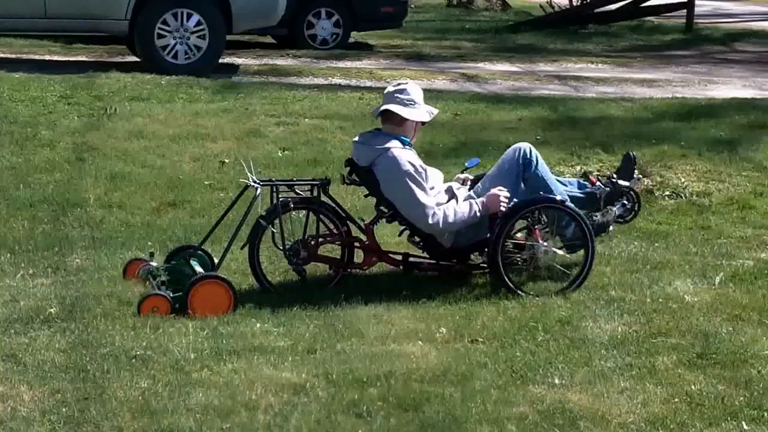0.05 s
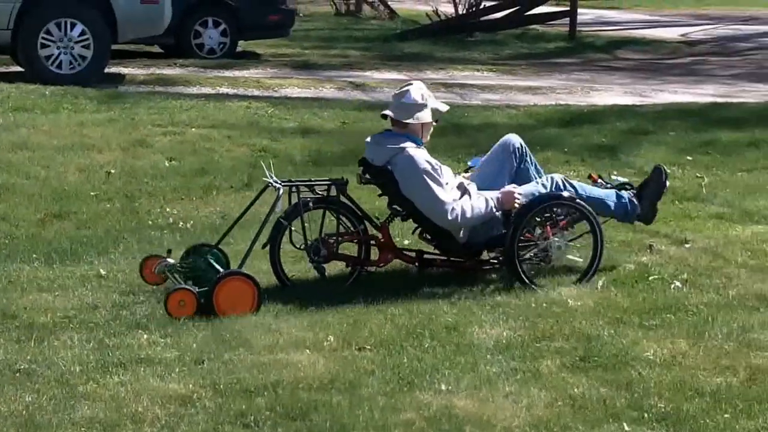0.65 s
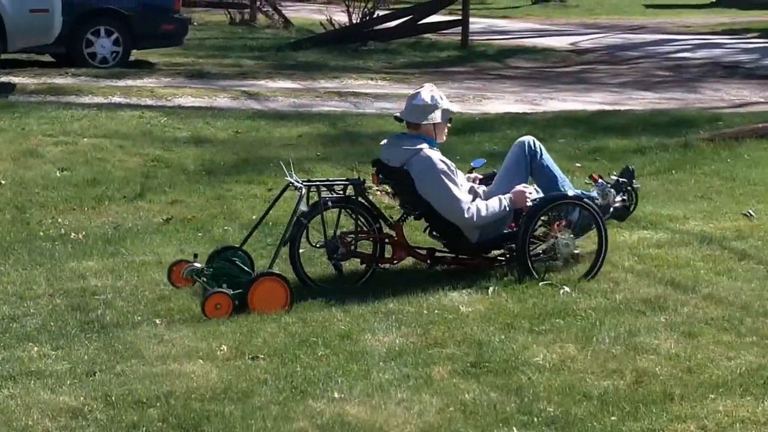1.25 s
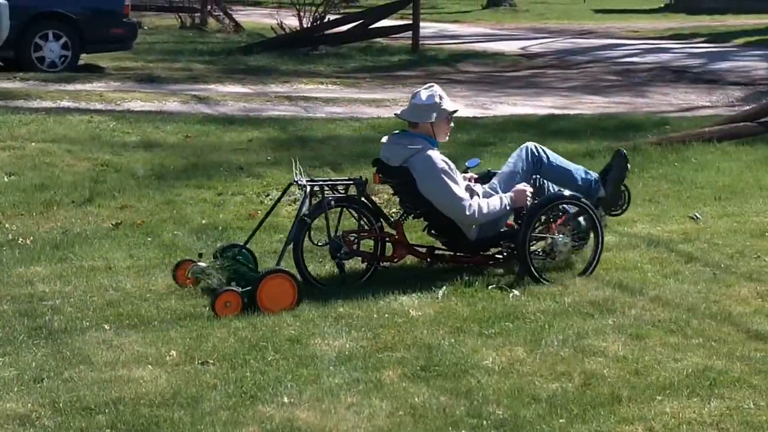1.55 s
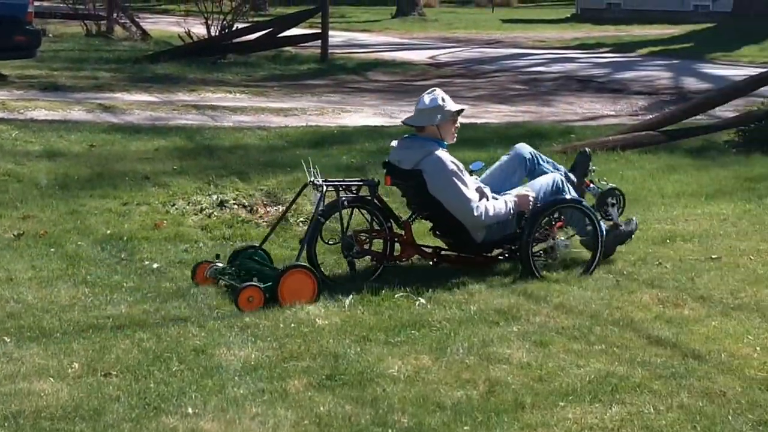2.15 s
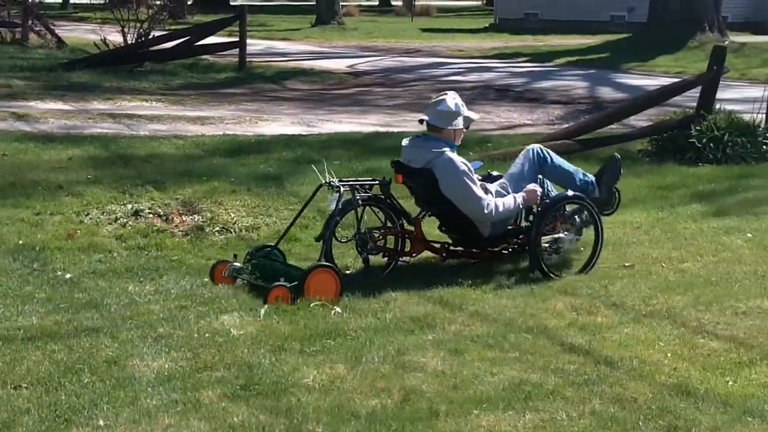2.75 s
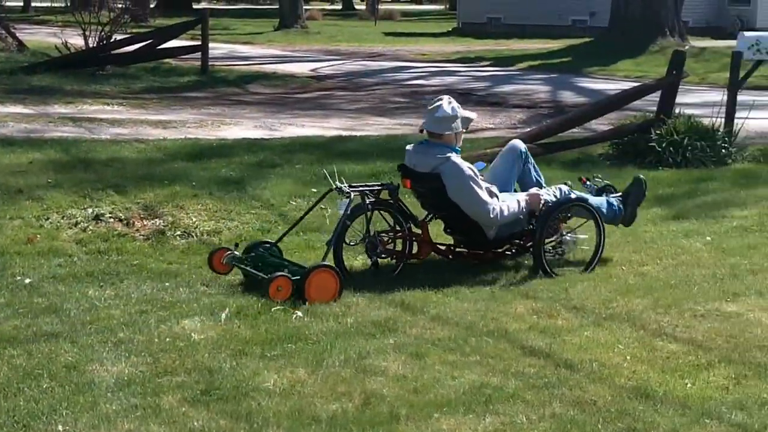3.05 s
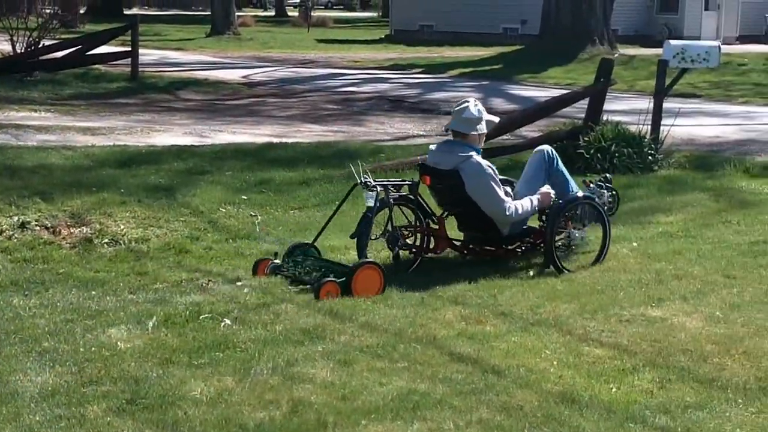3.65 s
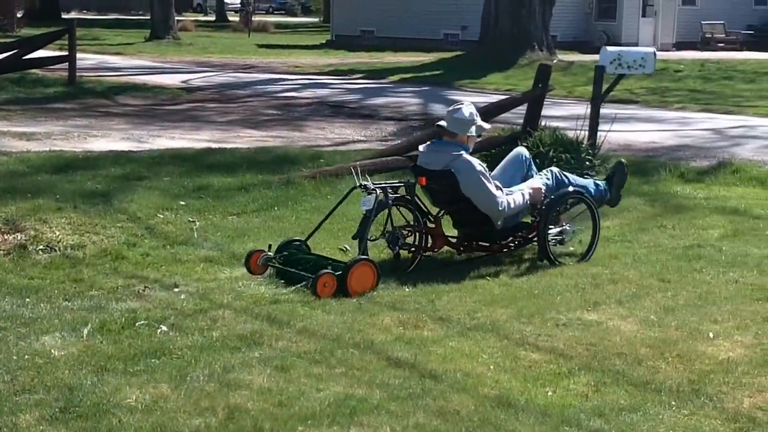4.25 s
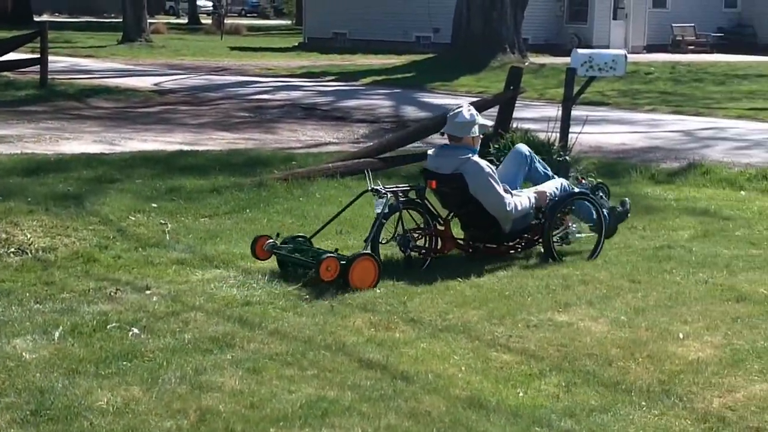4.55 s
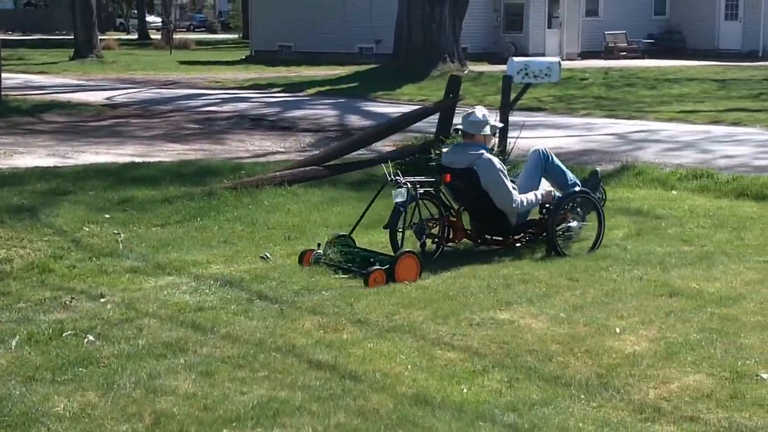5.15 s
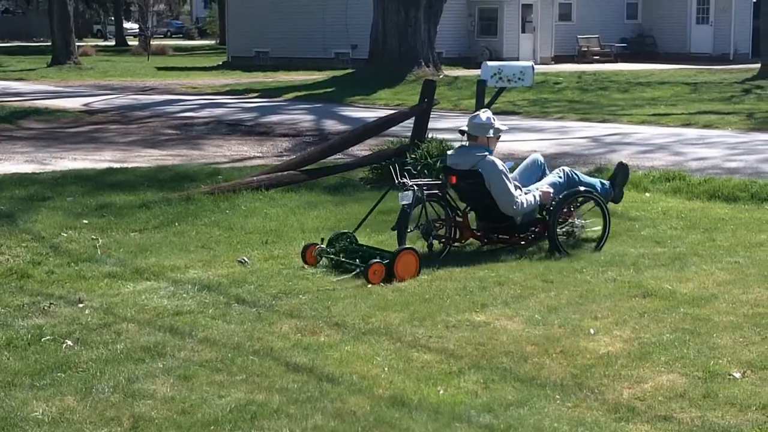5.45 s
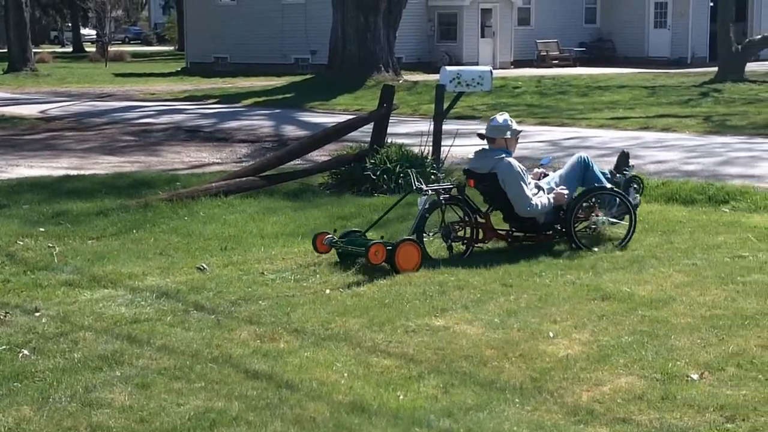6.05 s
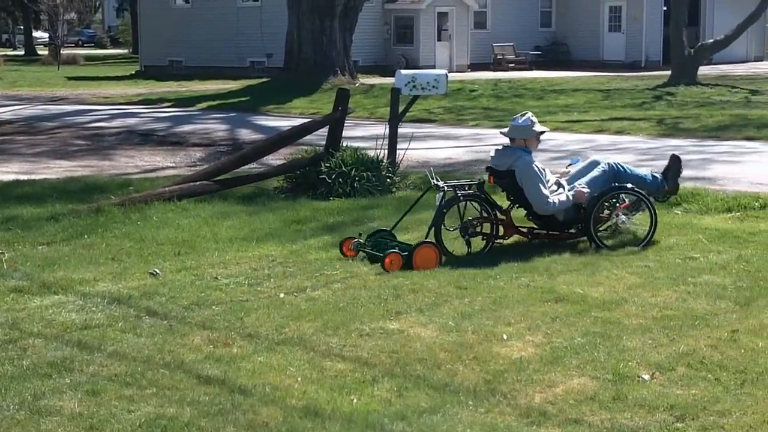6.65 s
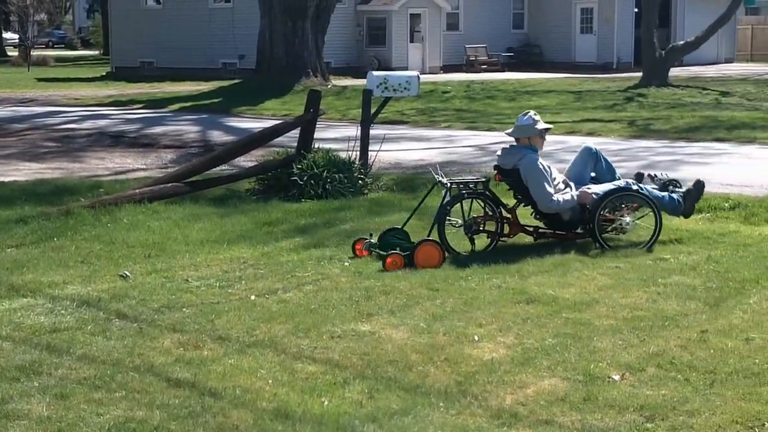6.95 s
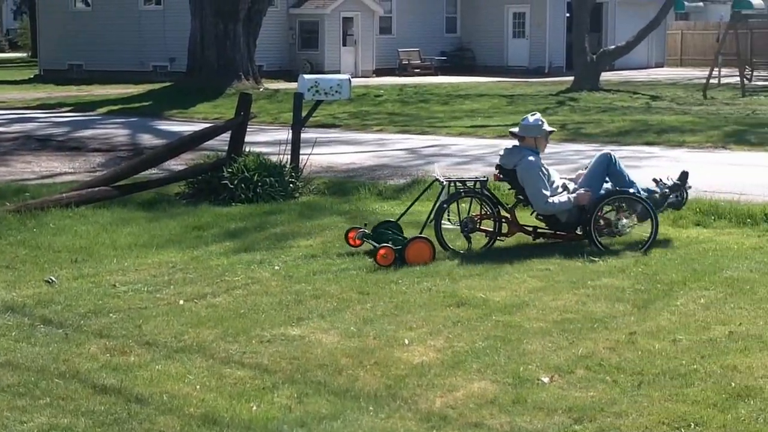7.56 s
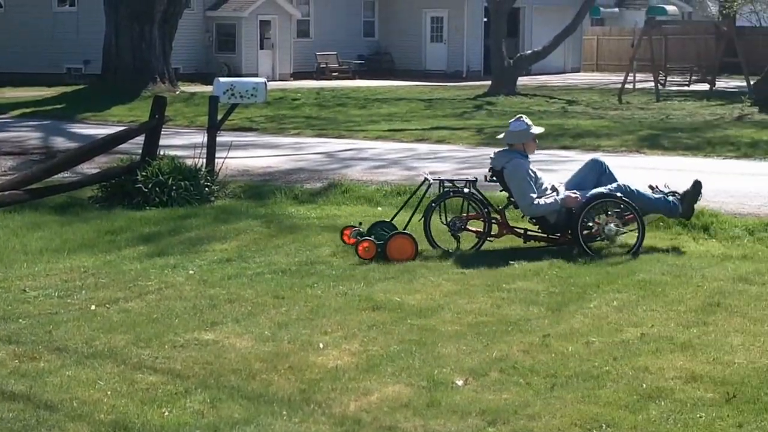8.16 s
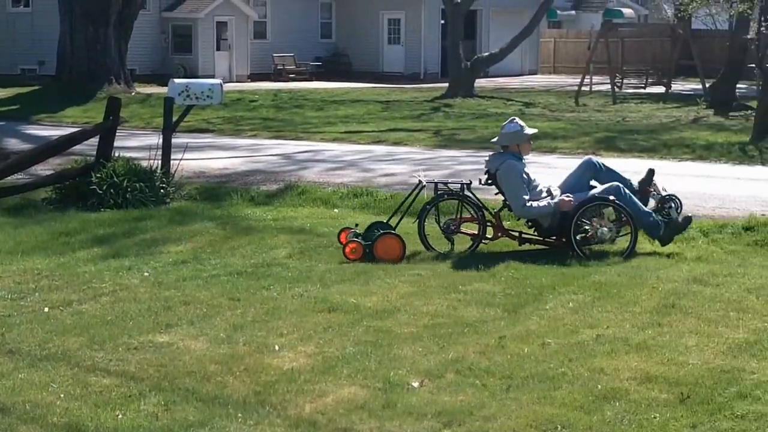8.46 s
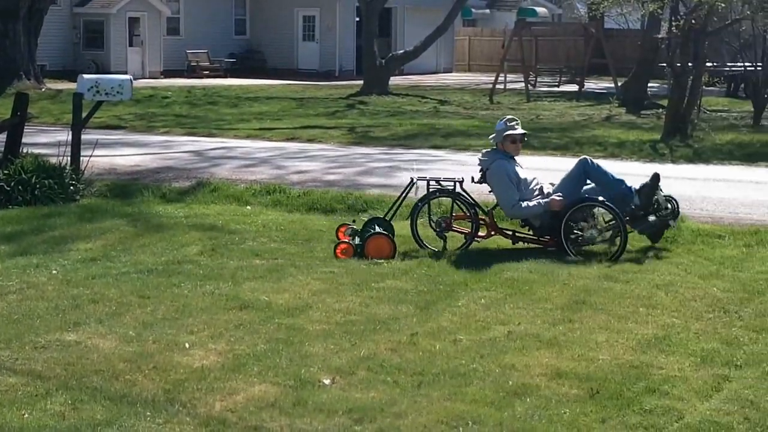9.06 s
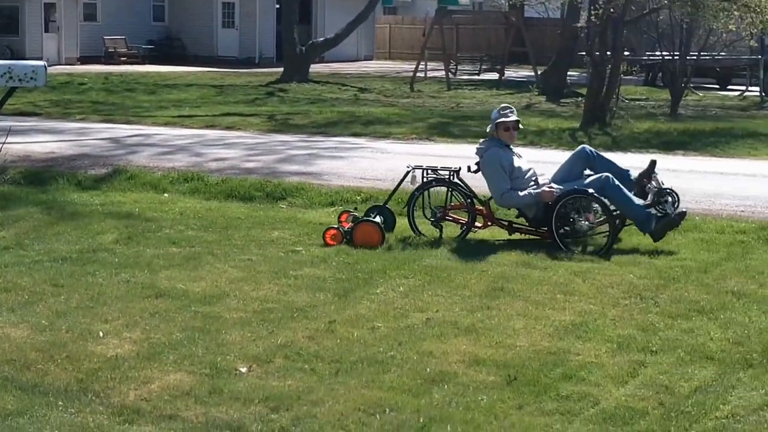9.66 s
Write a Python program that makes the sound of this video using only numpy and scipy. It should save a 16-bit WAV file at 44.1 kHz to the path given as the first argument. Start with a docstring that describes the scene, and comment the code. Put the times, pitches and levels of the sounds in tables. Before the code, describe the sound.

Out on a lawn, the spinning blades of a reel mower rasp through the grass ahead of the microphone, with sharp metallic knocks and rattles. Low gusts of wind soon rumble and thump on the microphone, coming and going to the end. Faint birds whistle downward at first, later piping and trilling, while an engine hums far away and the mower draws off a little.

```python
"""A reel mower towed over a lawn behind a pedal trike, heard ahead of a camera's stereo microphone.
From the start the blades snip and scrape, the frame clacks over bumps, an engine hums far off and a
distant bird slurs downwards. From 2 s gusts buffet the microphone, hardest near 4 s. After 5 s a bird
buzzes and pipes, then trills near 7 s as the slurs return. The mower, fainter by now, cuts on
under a last gust."""
import sys
import numpy as np
from scipy import signal
from scipy.fft import rfft, irfft, next_fast_len
from scipy.io import wavfile
from scipy.ndimage import uniform_filter1d, map_coordinates

SR = 44100
rng = np.random.default_rng(int(sys.argv[2]) if len(sys.argv) > 2 else 0)


def master_out(mix):
    """Clip the mix to full scale and print it as 16-bit PCM to the path in sys.argv[1]."""
    frames = np.transpose(np.atleast_2d(mix))
    ceiling = np.clip(frames, -1, 1)
    pcm = np.round(ceiling * 32767).astype(np.int16)
    wavfile.write(sys.argv[1], SR, pcm)


N = 436590

# The mower, ahead. Its reel spins between bites, fading as it draws away: (time [s], level [dB])
REEL_SPIN = [(0, -52), (1.8, -48), (2.02, -59), (2.15, -56.5), (4.2, -51.5), (4.62, -58), (4.75, -57),
             (7.0, -54), (9.9, -55)]
# bites into standing grass; lush tufts that throw clippings: (start [s], length [s], level [dB])
GRASS_BITES = [(.03, 0.45, -42.5), (.56, 0.91, -48.5), (1.5, 0.22, -45), (2.18, 0.37, -45.5),
               (2.68, 0.28, -47.5), (3.05, 0.031, -44), (3.42, 0.545, -45.5), (4.82, 0.235, -48),
               (5.04, 0.49, -47), (5.93, 0.27, -54), (6.39, 0.424, -51), (7.83, 0.89, -52.5),
               (9.02, 0.33, -51.5), (9.7, 0.3, -52.5)]
LUSH_TUFTS = [(.29, 0.069, -48), (1.53, 0.017, -46), (1.68, 0.034, -48.5), (2.78, 0.033, -51),
              (3.74, 0.33, -50.5), (4.95, 0.38, -54), (5.28, 0.15, -49), (6.62, 0.12, -57.5),
              (9.02, 0.28, -58.5)]
# spectra of cutting, flying clippings and dry snaps: (frequency [Hz], density [dB])
CUT_SPECTRUM = [(250, -12.5), (400, -6), (550, 2.5), (850, -8), (1000, -13), (1200, 1), (2050, -1.5),
                (3300, -2), (4000, -3.5), (5000, -25.5), (6200, -18.5), (7500, -34.5), (11000, -86)]
SPRAY_SPECTRUM = [(1700, -17.5), (3200, -0.5), (4800, -2), (6100, -9), (7400, -42.5), (9000, -28),
                  (10500, -20.5), (12000, -27), (15000, -39)]
SNAP_SPECTRUM = [(250, -33), (850, -18), (1200, -0.5), (2000, -1.5), (3300, 5), (4000, -1), (5000, -15),
                 (6200, -26), (7500, -47), (12000, -64)]
# narrow ring of the blades: (frequency [Hz], gain [dB])
BLADE_MODES = [(1065, 10), (1400, -14), (1825, 7.5), (2410, 8), (2990, 1), (4860, 5)]
# a blade grazes the bed knife: (start [s], length [s], level [dB], resonance [Hz])
KNIFE_GRAZES = [(1.915, .026, -45, 1300), (4.012, 0.022, -42.5, 2710)]
# the frame and hitch knock: (time [s], peak level [dB])
FRAME_KNOCKS = [(0.3229, -15), (0.337, -20.5), (0.4914, -25.5), (0.7049, -26), (1.5254, -25.5),
                (1.7904, -30), (1.8594, -26.5), (1.895, -32), (1.9186, -25.5), (1.9339, -27),
                (1.9968, -23.5), (2.001, -20.5), (2.0156, -20), (2.028, -30), (2.0598, -28),
                (2.0899, -14.5), (2.0955, -12), (2.1098, -23), (2.2563, -27), (2.646, -22), (2.709, -25.5),
                (3.0875, -26), (3.2595, -30), (3.411, -28), (3.434, -28), (3.495, -23.5), (4.751, -27),
                (4.7622, -27), (4.791, -26), (4.9054, -22), (6.3681, -21), (6.3733, -19.5), (6.4155, -28.5),
                (6.454, -30.5), (6.4856, -24), (6.739, -36), (6.7492, -30.5), (7.4533, -25),
                (8.2775, -28.5), (8.4246, -31), (8.4588, -28.5), (8.525, -30.5), (8.7393, -25.5),
                (8.756, -33), (9.187, -30), (9.576, -32), (9.5802, -19), (9.614, -25.5)]
# ring of the steel frame: (frequency [Hz], width [Hz], gain [dB])
FRAME_MODES = [(520, 120, -9), (1070, 130, -6), (1290, 170, -3), (1610, 170, -2), (2080, 1450, -8),
               (2360, 700, 0), (3100, 600, 0), (3640, 240, 1), (4800, 300, -11)]

# Wind, right on the microphone. Steady push of the breeze: (time [s], level [dB])
BREEZE_PUSH = [(0, -45), (1.3, -41), (2.1, -33), (3.0, -32.5), (4.4, -47), (4.65, -37), (4.95, -30.5),
               (5.45, -40.5), (6.3, -30), (7.3, -39.5), (8.0, -45.5), (8.35, -35.5), (8.7, -45), (9.9, -28)]
# gusts: (start [s], length [s], push [dB], fine turbulence [dB])
WIND_GUSTS = [(0.802, 0.067, -35, -51), (1.131, 0.016, -38.5, -42), (1.525, 0.022, -31, -43),
              (1.811, 0.036, -30.5, -41), (2.084, 0.33, -42, -42.5), (2.619, 0.063, -33, -37.5),
              (2.79, 0.078, -34, -32.5), (3.273, 0.071, -33, -29.5), (3.42, 0.079, -28.5, -44),
              (3.632, 0.12, -28, -29.5), (3.752, 0.2, -27, -23.5), (4.008, 0.11, -29, -26),
              (4.117, 0.076, -27, -29.5), (4.818, 0.096, -36.5, -56), (5.797, 0.13, -29.5, -32.5),
              (6.212, 0.13, -31.5, -30.5), (6.525, 0.028, -26.5, -23.5), (7.07, 0.044, -38, -39),
              (7.696, 0.12, -40.5, -41.5), (8.922, 0.15, -35, -38.5), (9.293, 0.03, -33, -46),
              (9.578, 0.11, -36, -31.5), (9.719, 0.15, -25.5, -32.5)]
# spectra of the rumble, the slowest eddies and fine turbulence: (frequency [Hz], density [dB])
RUMBLE_SPECTRUM = [(20, -36), (45, -4), (70, 0.5), (100, -3), (140, -13), (200, -22), (350, -43.5),
                   (2500, -120)]
SLOW_EDDY_SPECTRUM = [(12, -6), (38, 0), (70, -10), (700, -120)]
FLUTTER_SPECTRUM = [(40, -14.5), (115, 7.5), (170, 4.5), (280, -4.5), (420, -17), (600, -27), (950, -37.5),
                    (5000, -120)]
# the slowest eddies against the rest of the rumble: (time [s], gain [dB])
SLOW_EDDY_GAIN = [(0, -12), (4, -8.5), (6.5, -2), (8.6, 7), (9.9, 0.5)]
# sudden slaps of wind: (time [s], peak level [dB], eddy frequency [Hz])
WIND_SLAPS = [(3.638, -23, 139), (3.774, -17.5, 110), (3.801, -14, 140), (3.815, -18, 120),
              (3.859, -12.5, 150), (3.899, -10.5, 119), (3.913, -15, 100), (3.931, -14.5, 80),
              (3.991, -19, 149), (4.045, -15.5, 150), (4.066, -17.5, 169), (4.085, -19.5, 130),
              (4.18, -22, 80), (5.807, -16.5, 110), (5.818, -26, 128), (5.847, -22.5, 120),
              (5.942, -26, 90), (6.528, -21.5, 120), (6.543, -17, 229), (6.55, -11.5, 73.5),
              (7.073, -27, 110), (7.111, -21.5, 117), (7.785, -23.5, 87.5), (8.935, -20, 110),
              (9.298, -22.5, 101), (9.63, -12.5, 128), (9.641, -21, 129)]
# wind moaning round the camera body: (time [s], pitch [Hz], level [dB])
WIND_MOAN = [(1.9, 95, -50), (2.2, 106.3, -26), (2.5, 98.3, -47), (2.7, 133.9, -37), (2.85, 141.6, -25.5),
             (3.12, 124.3, -58), (3.3, 123, -24), (3.5, 129.7, -40), (3.75, 145.5, -20.5), (4.0, 146, -79)]

# Birds, at a distance. Note shapes: (time into the note [s], pitch [Hz], level [dB])
SLUR_SHAPE = [(0, 3600, -12), (.03, 3170, -2), (.07, 2500, 0), (.11, 2110, 0), (.15, 1920, 0),
              (.185, 1840, -7)]
ARCH_SHAPE = [(0, 4350, -12), (.025, 4680, 0), (.055, 4800, 0), (.09, 4480, -8)]
FALL_SHAPE = [(0, 5000, -10), (.02, 4850, 0), (.045, 4400, -1), (.075, 3450, -3)]
PEEP_SHAPE = [(0, 6250, -4), (.012, 6050, 0), (.025, 5850, -5)]
BUZZ_SHAPE = [(0, 5800, -12), (.04, 6100, 0), (.1, 6150, 0), (.15, 5800, -12)]
LOW_PIPE_SHAPE = [(0, 2850, -14), (.045, 2945, 0), (.08, 2965, 0), (.12, 2945, -3), (.17, 2980, -5),
                  (.21, 3040, -20)]
HIGH_PIPE_SHAPE = [(0, 3150, -45), (.045, 3120, -4), (.068, 3120, -2), (.095, 3185, -1), (.16, 3165, -5),
                   (.21, 3180, -20)]
TRILL_SHAPE = [(0, 5000, -6), (.006, 4500, 1), (.016, 3600, -2), (.028, 3300, -45), (.038, 4900, -11),
               (.046, 6500, -14), (.056, 7100, -18), (.068, 7400, -21), (.076, 7450, -34)]
# when each note is sung: (time [s], level [dB])
SLUR_NOTES = [(.4, -51), (.79, -48.5), (1.16, -48), (1.53, -47), (7.018, -53), (7.475, -52.5),
              (7.884, -51.5), (8.222, -51), (8.572, -49.5)]
ARCH_NOTES = [(.695, -50.5), (4.83, -56)]
FALL_NOTES = [(2.54, -59), (2.68, -55)]
PEEP_NOTES = [(3.024, -57), (3.148, -64), (3.252, -64)]
BUZZ_NOTES = [(5.45, -61), (5.94, -61.5), (6.43, -62)]
PIPE_NOTES = [(5.668, -47.5), (6.172, -48)]

# Far off. An engine's hum: (time [s], pitch [Hz], level [dB])
ENGINE_HUM = [(0, 69, -53), (1.8, 68.5, -44), (3.2, 70.74, -47.5), (4.4, 73.53, -37), (5.2, 70, -49),
              (9.9, 69.2, -46)]
# spectrum of the open air: (frequency [Hz], density [dB])
AIR_SPECTRUM = [(30, 10), (150, 4), (330, -2.5), (1100, -5), (2000, -21.5), (3400, -33), (5000, -42.5),
                (6300, -33.5), (7600, -40), (10500, -35), (15000, -39.5)]

# The microphone. How alike its two ports hear: (frequency [Hz], likeness [0-1])
PORT_LIKENESS = [(300, .99999), (1000, .998), (2500, .994), (4500, .97), (8000, .68), (12000, .58)]
# the camera's narrow stop bands: (frequency [Hz], width [Hz])
CAMERA_NOTCHES = [(4215, 420), (7900, 800), (8800, 400), (12700, 700)]


def reel(blade_hz=48, snip_db=0.5, judder_db=1.63, ring_width_hz=55):
    """Blades sweep the bed knife, shear stalks and ring; stems snap, clippings fly, parts chatter."""
    def blades(f):
        modes = sum(amp(db) / (1 + 2j * (f - hz) / ring_width_hz) for hz, db in BLADE_MODES)
        return modes / (1 + (f / 6500) ** 8)

    spin_db, = curves(REEL_SPIN)
    cutting = np.sqrt(amp(spin_db) ** 2 + swells(GRASS_BITES, attack_s=0.099, release_s=0.048))
    showers = swells(LUSH_TUFTS, attack_s=0.05, release_s=0.021)
    clippings = np.sqrt((amp(-10.5) * cutting) ** 2 + showers)
    blade_passes = np.cumsum(blade_hz * amp(1.5 * wobble(3.5))) / SR
    stroke = amp(snip_db * np.cos(2 * np.pi * blade_passes) + judder_db * wobble(110))
    shear = stroke * (.85 * noise() + .65 * unit(impacts(rate=550, spread_db=2)))
    rasp = amp(-1) * coloured(scrape_patches(shear, depth_db=3.2), CUT_SPECTRUM)
    ring = amp(-8) * unit(filtered(stroke * impacts(rate=250, spread_db=5.5), blades))
    chatter = amp(-10) * unit(filtered(impacts(rate=60, spread_db=1.5), steel_frame))
    spray = amp(-0.5) * coloured(np.sqrt(stroke) * noise(), SPRAY_SPECTRUM)
    snaps = amp(-12) * coloured(impacts(rate=55, spread_db=2), SNAP_SPECTRUM)
    return cutting * (rasp + ring + chatter + snaps) + clippings * spray


def scrape_patches(x, depth_db):
    """Every scrape excites its own few pitches: brief narrow patches of random gain."""
    spectra = signal.stft(x, nperseg=512)[2]
    patches = uniform_filter1d(rng.standard_normal(spectra.shape), size=3, axis=0)
    patches = uniform_filter1d(patches, size=4, axis=1)
    return signal.istft(spectra * amp(depth_db * unit(patches)), nperseg=512)[1][:N]


def knife_grazes(q=2.4):
    """Steel rubs on steel for a moment and sings in one broad resonance."""
    rub = lambda hz: unit(filtered(noise(), lambda f: 1 / (1 + 2j * q * (f / hz - 1)) ** 2))
    return sum(rub(hz) * np.sqrt(swells([swell], attack_s=0.0091, release_s=0.0085))
               for *swell, hz in KNIFE_GRAZES)


def frame_clacks(body_hz=1900, scrape_t60=.052, rebound_t60=.085, grind_t60=.012):
    """Steel snaps on steel; slack parts scrape before each knock and rebound after, ringing the frame."""
    out, lead = np.zeros(N), SR // 40
    t = np.arange(-lead, SR // 8) / SR
    contact = (np.arange(len(t)) == lead) * 1.0
    for s, db in FRAME_KNOCKS:
        body_db = rng.normal(6, 3.1)
        body = lambda f: amp(body_db / (1 + (f / body_hz) ** 4))
        ticks = unit(rng.standard_normal(len(t)) * (rng.random(len(t)) < 600 / SR))
        rattle = ticks * amp(-60 * np.abs(t) / np.where(t < 0, scrape_t60, rebound_t60))
        grind = rng.standard_normal(len(t)) * (t >= 0) * amp(-13 - 60 * np.abs(t) / grind_t60)
        mode_db = rng.normal(0, 2.5, len(FRAME_MODES))
        ring = filtered(rattle, lambda f: steel_frame(f, mode_db) * body(f))
        snap = filtered(contact + grind, lambda f: amp(along(SNAP_SPECTRUM, f)) * body(f))
        add(out, s + t[0], amp(db) * peaked(peaked(snap) + amp(-10) * peaked(ring)))
    return out


def steel_frame(f, mode_db=(0,) * len(FRAME_MODES), contact_hz=5600):
    """Response of the frame, each mode with its own extra gain; blunt contact leaves out the top."""
    modes = sum((-1) ** k * amp(db + mode_db[k]) * 1j * f * width / (hz * hz - f * f + 1j * f * width)
                for k, (hz, width, db) in enumerate(FRAME_MODES))
    return modes * signal.freqs(*signal.butter(N=5, Wn=contact_hz, analog=True), f)[1]


def wind(puff_db=4.3, puffs_per_s=8, lump_db=3.5):
    """Gusts ride a puffing breeze, press on the microphone and break into turbulence and slaps."""
    breeze_db, slow_db = curves(BREEZE_PUSH) + curves(SLOW_EDDY_GAIN)
    breeze_db += puff_db * (wobble(puffs_per_s) - 1)
    start, length, push_db, fine_db = np.transpose(WIND_GUSTS)
    gusts = lambda db: swells(zip(start, length, db), attack_s=0.016, release_s=0.016)
    pressure = np.sqrt(amp(breeze_db) ** 2 + gusts(push_db))
    turbulence = np.sqrt(amp(breeze_db - 13.5) ** 2 + gusts(fine_db))
    thumps = amp(2 * wobble(24))
    rumble = coloured(noise() * thumps, RUMBLE_SPECTRUM)
    slow_eddies = amp(slow_db) * coloured(noise() * thumps, SLOW_EDDY_SPECTRUM)
    flutter = coloured(noise() * np.sqrt(thumps) * amp(lump_db * wobble(60)), FLUTTER_SPECTRUM)
    return amp(1) * pressure * (rumble + slow_eddies) + turbulence * flutter + wind_moan() + wind_slaps()


def wind_moan():
    """Air flows round the camera body with a low, unsteady tone."""
    hz, db = curves(WIND_MOAN)
    return amp(db + 3.7 * wobble(24.81)) * np.sin(2 * np.pi * np.cumsum(hz) / SR + 1.05 * wobble(22))


def wind_slaps(wake_db=-24, wake_t60=0.035):
    """An eddy bursts on the microphone: a pressure kick, higher for a smaller eddy, and a ragged wake."""
    out, lead = np.zeros(N), SR // 40
    t = np.arange(-lead, SR // 16) / SR
    for s, db, hz in WIND_SLAPS:
        kick = rng.standard_normal(len(t)) * (t >= 0) * amp(wake_db - 60 * np.abs(t) / wake_t60)
        kick[lead] += 1
        eddy = filtered(kick, lambda f: 1j * f * np.exp(-f / hz))
        add(out, s + t[0], amp(db) * peaked(eddy))
    return out


def birds(trill_start_s=6.868, trill_step_s=.0995):
    """One bird slurs downwards, one chips and peeps, one buzzes and pipes in two voices, then trills."""
    # the trill is loudest in the middle
    trill = [(trill_start_s + k * trill_step_s, -49 - 4 * u ** 2)
             for k, u in enumerate(np.linspace(-1, 1, 9))]
    song = sing(LOW_PIPE_SHAPE, PIPE_NOTES, waver_hz=13)
    song += sing(HIGH_PIPE_SHAPE, PIPE_NOTES, waver_hz=7.9)
    song += sing(BUZZ_SHAPE, BUZZ_NOTES, waver_hz=295, buzz_depth_hz=540)
    song += sing(TRILL_SHAPE, trill, waver_hz=69.8)
    chips = sing(ARCH_SHAPE, ARCH_NOTES, waver_hz=45) + sing(FALL_SHAPE, FALL_NOTES, waver_hz=59.5)
    peeps = sing(PEEP_SHAPE, PEEP_NOTES, waver_hz=110)
    slurs = sing(SLUR_SHAPE, SLUR_NOTES, waver_hz=32)
    return (song + chips + peeps + slurs) * amp(2 * wobble(45))


def sing(shape, notes, waver_hz, buzz_depth_hz=0, buzz_hz=142):
    """One whistled shape, wavering anew at each note; a fast flutter of pitch makes it buzzy."""
    out, size = np.zeros(N), int(shape[-1][0] * SR)
    hz, shape_db = curves(shape, size=size)
    flutter = buzz_depth_hz * np.sin(2 * np.pi * buzz_hz * np.arange(size) / SR)
    waver = waver_hz * wobble(150)
    for s, db in notes:
        phase = 2 * np.pi * np.cumsum(hz + flutter + waver[round(s * SR):][:size]) / SR
        add(out, s, amp(db + shape_db) * signal.windows.tukey(size, .1) * np.sin(phase))
    return out


def distant(song):
    """Birdsong arrives direct, with a smear from nearby branches and a faint tail from the yard."""
    return amp(-.6) * song + amp(-11) * yard(song, t60=.06) + amp(-11.5) * yard(song, t60=.9)


def yard(x, t60):
    """Scatter from trees and house walls, dying by 60 dB in t60 seconds."""
    t = np.arange(SR // 2) / SR
    tail = rng.standard_normal(len(t)) * amp(-60 * t / t60) * (1 - np.exp(-t / 0.0067))
    return signal.fftconvolve(x, tail / np.linalg.norm(tail))[:N]


def far_engine():
    """An engine far off, heard as one low drifting tone."""
    hz, db = curves(ENGINE_HUM)
    return amp(db + 0.92 * wobble(3.6)) * np.sin(2 * np.pi * np.cumsum(hz) / SR)


def open_air():
    """A soft, almost steady hush behind everything."""
    return amp(-49.5 + 0.25 * wobble(0.16)) * coloured(noise(), AIR_SPECTRUM)


def amp(db):
    """Decibels to gain."""
    return 10 ** (np.asarray(db) / 20)


def unit(x):
    """Scale to rms 1."""
    return x / np.sqrt(np.mean(x ** 2) + 1e-20)


def peaked(x):
    """Scale to a peak of 1."""
    return x / np.abs(x).max()


def along(points, hz):
    """Interpolate (frequency [Hz], value) points on a log axis."""
    f, values = np.transpose(points)
    return np.interp(np.log(hz + 1), np.log(f + 1), values)


def curves(rows, size=N):
    """One value per sample for each column after the time."""
    times, *columns = np.transpose(rows)
    return [np.interp(np.arange(size) / SR, times, column) for column in columns]


def swells(rows, attack_s, release_s):
    """Summed power of (start [s], length [s], level [dB]) swells: each rises, holds and dies away."""
    t, power = np.arange(N) / SR, np.zeros(N)
    for start, length, db in rows:
        rise = np.clip(1 + (t - start) / attack_s, 0, 1)
        fall = np.exp(-np.clip((t - start - length) / release_s, 0, 20))
        power += (amp(db) * rise * fall) ** 2
    return power


def wobble(rate):
    """A smooth random curve, rate knots a second."""
    knots = rng.standard_normal(int(N * rate / SR) + 4)
    coarse = np.arange(0, N, 24)
    return np.interp(np.arange(N), coarse, map_coordinates(knots, [coarse * rate / SR]))


def noise():
    """White noise."""
    return rng.standard_normal(N)


def impacts(rate, spread_db):
    """Random tiny impulses of uneven size, about rate a second."""
    return (rng.random(N) < rate / SR) * rng.choice([-1, 1], N) * amp(spread_db * np.clip(noise(), -2, 2))


def filtered(x, response):
    """x through a complex response of frequency."""
    size = next_fast_len(x.shape[-1] + SR // 4)
    return irfft(rfft(x, size) * response(np.fft.rfftfreq(size, 1 / SR)), size)[..., :x.shape[-1]]


def coloured(x, spectrum):
    """x shaped by a spectrum, at rms 1."""
    return unit(filtered(x, lambda hz: amp(along(spectrum, hz))))


def add(track, s, sound):
    """Mix a sound in at time s."""
    part = track[max(round(s * SR), 0):][:len(sound)]
    part += sound[:len(part)]


def stereo_ports(mid):
    """Two closely spaced ports hear alike except in the treble, the left lagging by a sample."""
    alike = lambda hz: np.clip(along(PORT_LIKENESS, hz), 0, 1)
    # scattered sound reaches the ports at random phase, the more so the higher it is
    side = filtered(mid * unit(wobble(400)), lambda hz: np.sqrt((1 - alike(hz)) / (1 + alike(hz))))
    lag = lambda hz: np.exp(1j * np.pi * hz / SR * np.array([[-1], [1]]))
    return filtered(np.array([mid + side, mid - side]), lag)


def scene():
    """The mower ahead on the lawn, birds and engine beyond it, wind on the microphone itself."""
    mower = reel() + knife_grazes() + frame_clacks()
    song = distant(birds())
    ahead = mower + amp(-15) * yard(mower, t60=0.87) + song + far_engine() + open_air()
    return stereo_ports(ahead) + wind()


def record(dry, top_hz=15200):
    """The camera notches out narrow bands and limits the treble."""
    notches = lambda f: np.prod([(hz * hz - f * f) / (hz * hz - f * f + 1j * f * width)
                                 for hz, width in CAMERA_NOTCHES], axis=0)
    soft_ends = signal.windows.tukey(N, .001)
    return filtered(dry * soft_ends, lambda f: notches(f) * (f < top_hz))


dry = scene()
out = record(dry)
master_out(out)
```